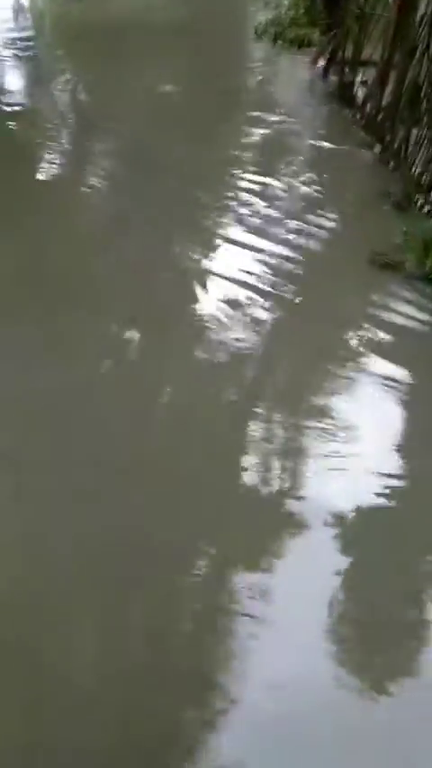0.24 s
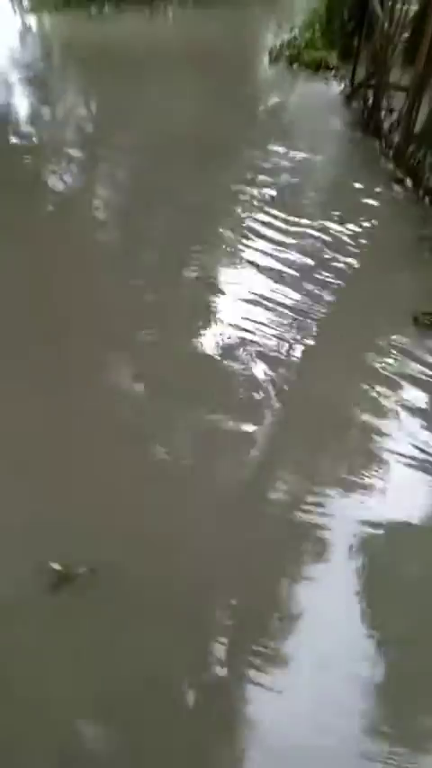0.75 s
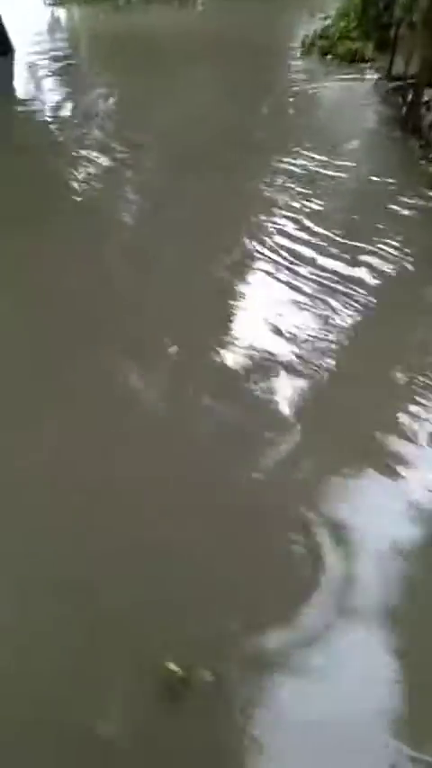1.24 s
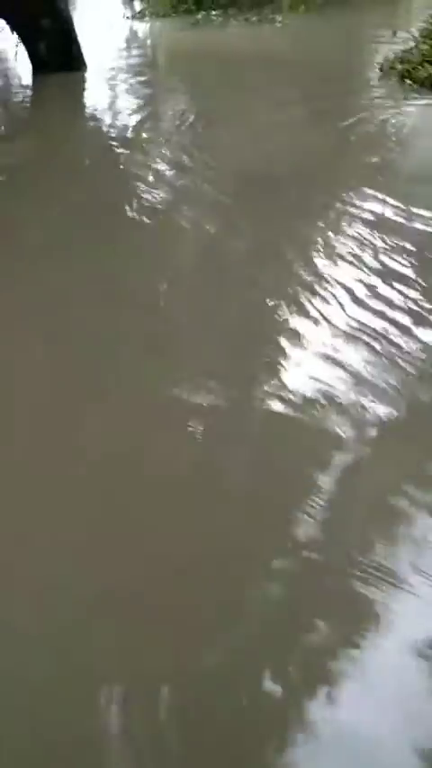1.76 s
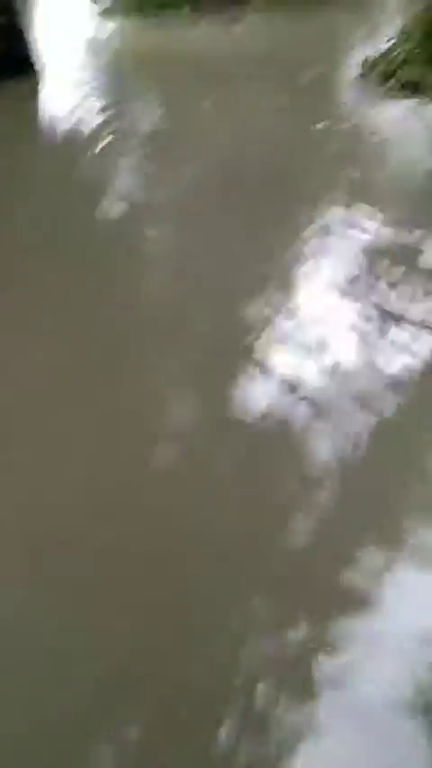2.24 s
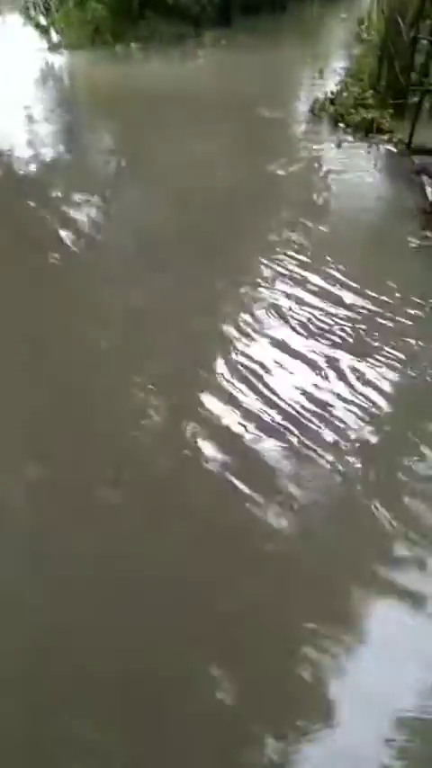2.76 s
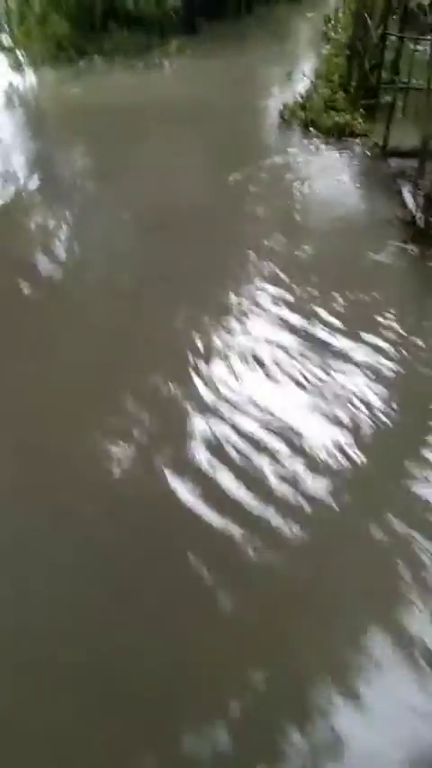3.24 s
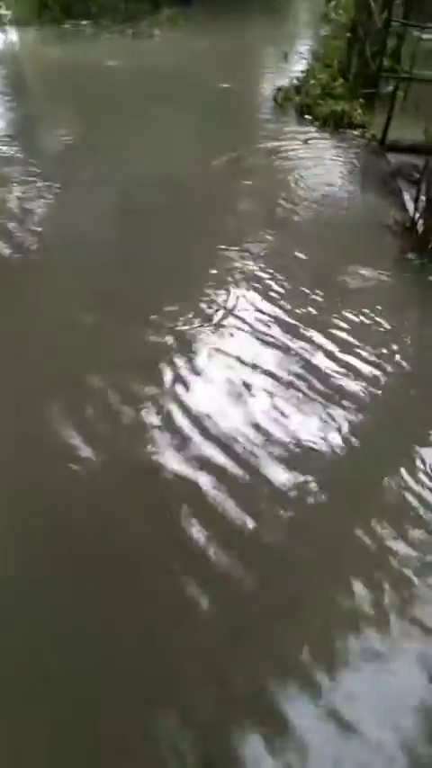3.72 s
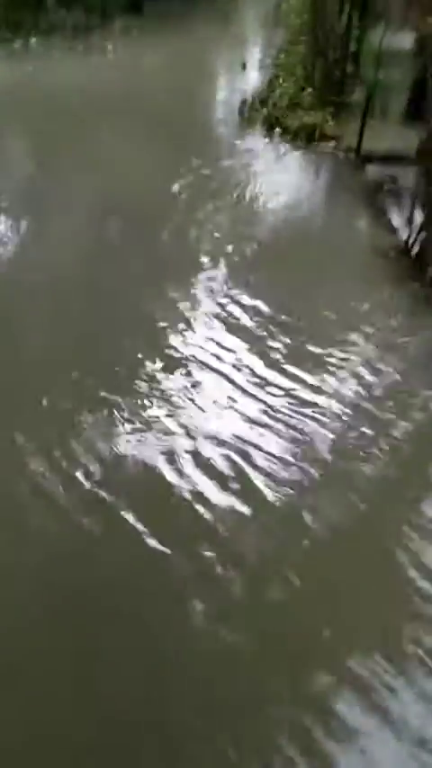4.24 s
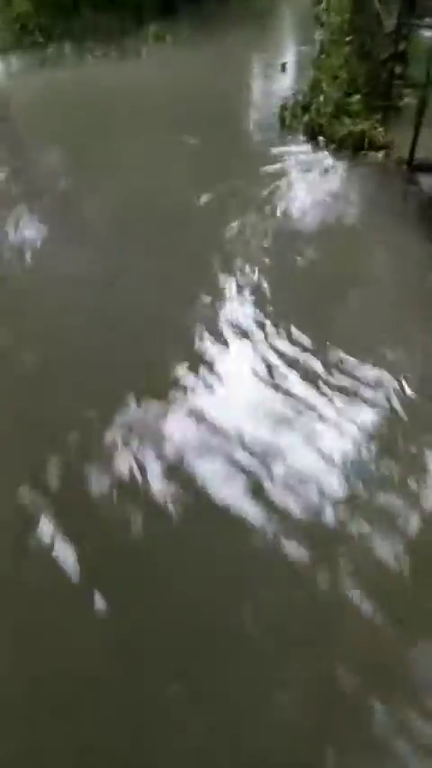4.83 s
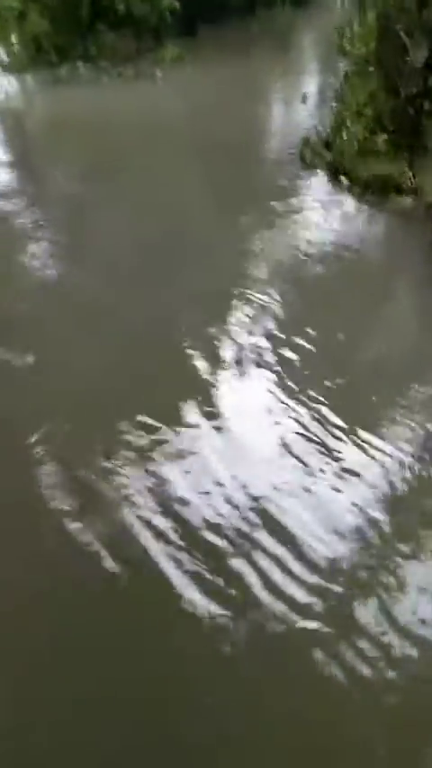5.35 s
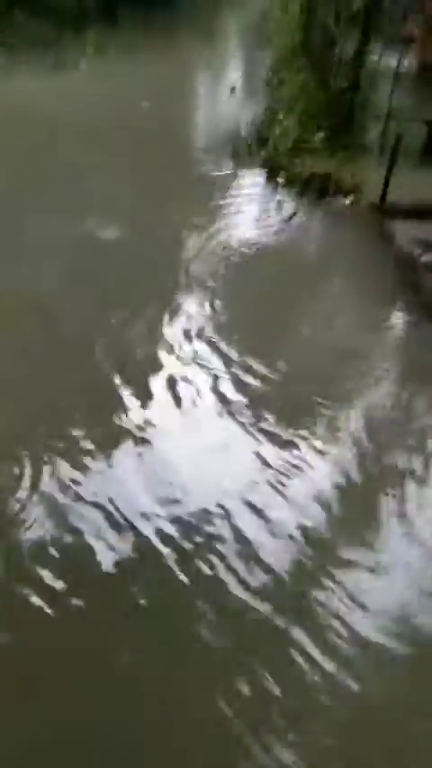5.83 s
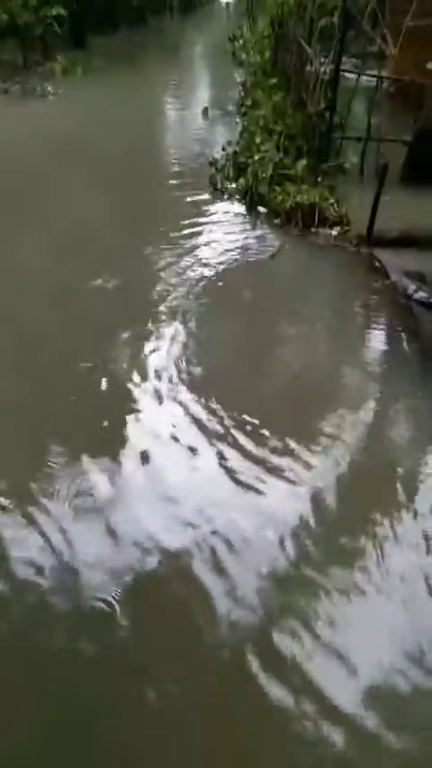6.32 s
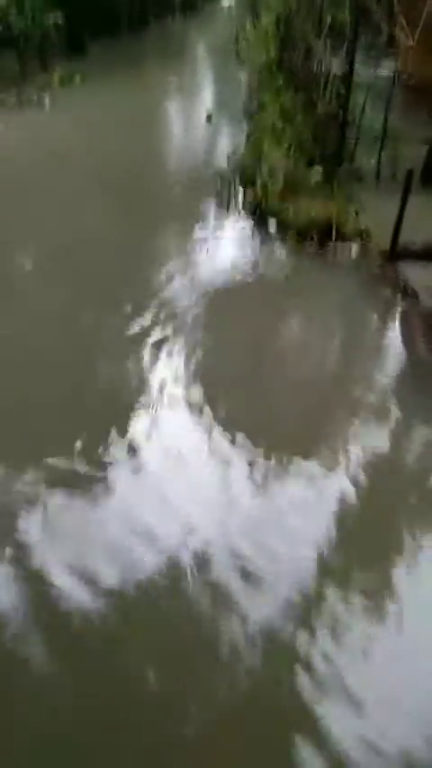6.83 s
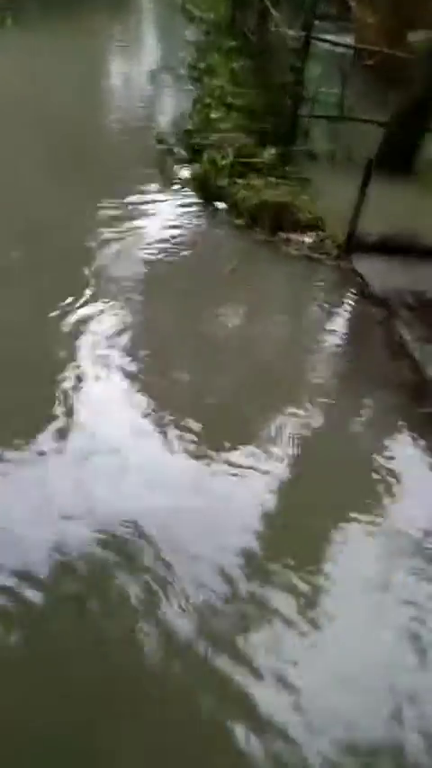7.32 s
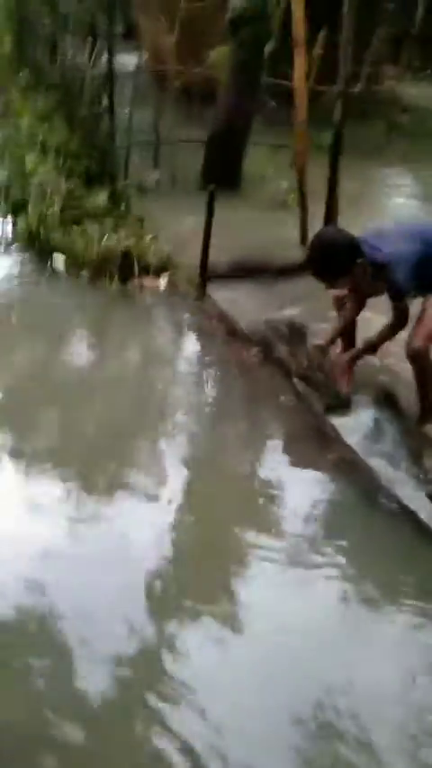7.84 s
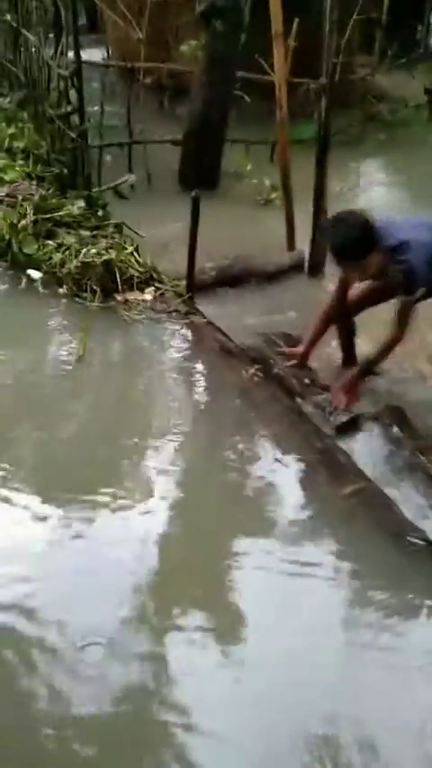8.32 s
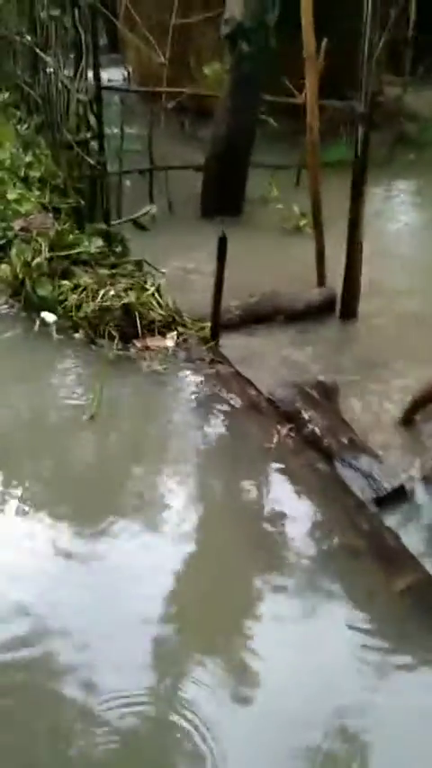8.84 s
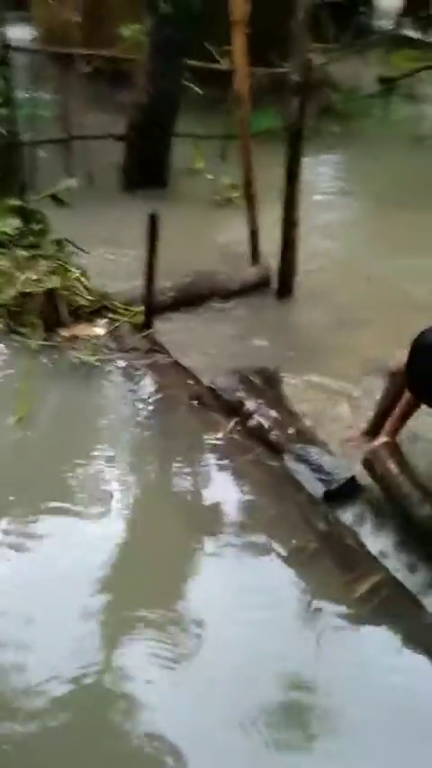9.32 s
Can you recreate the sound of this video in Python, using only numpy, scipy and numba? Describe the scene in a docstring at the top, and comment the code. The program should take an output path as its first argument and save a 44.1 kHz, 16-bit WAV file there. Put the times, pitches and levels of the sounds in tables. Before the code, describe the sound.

Floodwater pours over a low barrier, bubbling and hissing with gulps and small splashes, slowly fading and turning thin and patchy.

```python
"""Floodwater pours over a low barrier beside a flooded road while a phone is carried past and away.
From the start, bubbles of all sizes ring in the spill under hissing spray, fizzing foam and ticking
droplets, with puffs of low rumble. After a second, single gulps and splashes join in; the gulps stand
out more as the spill falls behind and its colour turns. All the while the phone's noise suppressor
slowly learns the rush, eating ever more holes into it."""
import sys
import numpy as np
from scipy import signal
from scipy.fft import rfft, irfft
from scipy.io import wavfile
from scipy.ndimage import uniform_filter1d
from numba import njit

SR = 44100
rng = np.random.default_rng(int(sys.argv[2]) if len(sys.argv) > 2 else 0)


def persist_wave(psi):
    """Save psi, clipped to +-1, as 16-bit WAV."""
    counts = np.round(np.clip(psi, -1, 1) * 32767).astype(np.int16)
    wavfile.write(sys.argv[1], SR, np.atleast_2d(counts).T)


N = 422029

# Rumble, gulping, gurgle, burble, rush and spray. Each row: lowest and highest pitch in Hz, bubbles
# per second, cycles to fade by 30 dB, size scatter in dB, share of plain hiss from 0 to 1.
BUBBLE_SWARMS = [(44, 229, 160, 2.33, 4, 0.98), (205.4, 429, 200, 4.85, 0.5, 0.1),
                 (471.4, 893, 220, 13.6, 3.5, 0.89), (815.5, 1644, 500, 15.2, 2, 0.96),
                 (1530, 2375, 1500, 15.1, 3, 0.94), (2436, 16800, 6000, 5.7, 2, 0.76)]
# Tone of the spill. Each row: frequency in Hz, gain in dB.
WATER_TONE = [(24, -40), (45, -14), (123, -13), (203, -18), (303, -10.5), (463, -7.5), (763, -3.5),
              (980, -8.5), (2070, -1), (4300, -4.5), (7240, -3.5), (9000, -12.5), (12000, -23),
              (15700, -27)]
# Hollows ringing under the falling sheet of water. Each row: pitch in Hz, width in Hz, lift in dB.
SHEET_HOLLOWS = [(101.7, 85, 4), (316, 208, 12.5), (565, 180, 4), (1024, 260, 12.5), (1414, 176, 11.5),
                 (1808, 158, 9), (2187, 140, 3), (7520, 73, 10), (8040, 270, 3), (8630, 540, 5)]
# The spill fades as the phone is carried off. Each row: time in seconds, then the fader in dB for the
# big bubbles, the rush and the spray.
SPILL_FADERS = [(0, 0.5, -29.5, -25), (.7, 1, -31, -25), (1.3, 0, -32.5, -25), (2, 0, -31.5, -25.5),
                (2.6, -4, -33, -26.5), (3, -4, -31.5, -26), (3.5, -3, -33, -27), (4.2, -8.5, -33, -28),
                (4.65, -7.5, -34.5, -29), (5.15, -12, -37, -28), (5.6, -12, -36, -28), (6.1, -16, -35, -29),
                (6.5, -14.5, -34, -28.5), (7.05, -19.5, -35.5, -30), (7.4, -18.5, -33.5, -30),
                (7.86, -18.5, -35, -31.5), (8.4, -14.5, -34.5, -30), (8.95, -19, -37, -31.5),
                (9.3, -16.5, -35, -30.5), (9.57, -19.5, -34, -31)]
# The four lowest swarms. Each row: base level in dB, share of the big-bubble fader, flutter in dB.
BIG_BUBBLE_MIX = [(-56, 0.14, 3), (-44, 0.71, 1), (-41.5, 0.83, 2), (-29, 0.87, 0)]
# Spurts and lulls of spray. Each row: centre in seconds, length in seconds, lift in dB.
SPRAY_SPURTS = [(4.47, .1, -1), (4.613, 0.12, 3), (5.19, 0.07, -1.5), (6.097, .08, -1.5), (6.726, 0.075, 0),
                (7.05, 0.091, -1.5), (7.5, 0.086, 0.5), (8.174, .1, 1), (8.31, .08, -1), (8.593, 0.041, 0),
                (8.73, 0.088, -1), (8.964, 0.076, -1), (9.078, 0.066, 0.5), (9.293, .07, -1.5)]
# Colour as the phone turns. Each row: frequency and width in Hz, lift in dB when facing and when
# turned away, halfway time in seconds.
TURNING_BANDS = [(1297, 250, -5, 1.5, 2.2), (3630, 2160, 2, -3.5, 4.24), (7596, 170, -7.5, -14, 5.5),
                 (7870, 310, 1.5, -21, 9.5), (3200, 190, -1, 2.5, 1.3), (3750, 360, 0.5, 5.5, 10.3),
                 (5230, 670, 0.5, 2.5, 2.6), (6840, 780, 1.5, -2, 7.1), (2550, 170, 3, -2.5, 2)]
# One ringing band comes and goes. Each row: time in seconds, lift in dB.
RINGING_LIFT = [(0, 0.5), (3, -0.5), (4.5, -0.5), (5.8, 0), (6.3, -4.5), (6.75, -7.5), (7.0, -2.5),
                (7.5, -7), (8.3, -4), (8.5, 1), (8.85, 1), (9.0, -1), (9.15, -5), (9.23, 2.5), (9.57, 2.5)]
# Low puffs of wind or handling. Each row: peak time in seconds, length in seconds, lift in dB.
RUMBLE_PUFFS = [(0.212, 0.21, 26), (0.646, 0.089, 11), (1.02, 0.0905, 14), (1.775, 0.42, 16.5),
                (2.14, 0.084, -0.5), (2.62, 0.331, 6), (2.9, 0.47, 8), (3.29, 0.091, 5), (3.694, 0.21, 26),
                (4.366, 0.48, 11), (4.61, 0.15, 10), (4.917, 0.1, 14), (5.143, 0.12, 18), (5.483, 0.19, 11),
                (5.82, 0.092, 8.5), (6.105, 0.057, 10), (6.318, 0.29, 20), (6.823, 0.83, 17.5),
                (7.297, 0.11, 12.5), (7.52, 0.075, 10), (7.765, 0.68, 12), (8.297, 0.2, 5.5),
                (8.6, 0.21, 6), (8.794, 0.17, 17), (9.14, .2, 12.5), (9.42, 0.36, 17.5)]
# Flurries and lulls of like-sized bubbles. Each row: peak time and length in seconds, pitch in Hz,
# lift in dB.
BUBBLE_FLURRIES = [(0.92, 0.25, 305.9, 9), (1.098, 0.13, 305, 8), (1.325, 0.17, 477, 19),
                   (1.78, 0.33, 198, 6.5), (2.09, 0.047, 310, 9), (2.584, 0.46, 294, 9.5),
                   (2.808, 0.34, 1160, 6.5), (3.48, 0.085, 340, 4), (3.694, 0.14, 286, 14.5),
                   (3.718, 0.11, 750, 14), (3.925, 0.06, 700, 13.5), (4.153, 0.074, 343, 14),
                   (4.315, 0.037, 426, 14), (4.469, 0.022, 318, 11), (4.453, 0.047, 1190, 5.5),
                   (4.613, 0.056, 312, 2.5), (4.65, 0.2, 950, 5.5), (4.634, .15, 2880, 2.5),
                   (4.747, 0.19, 600, 14.5), (4.933, 0.11, 322, 6), (5.134, 0.12, 302, 16.5),
                   (5.17, 0.081, 560, 9), (5.326, 0.12, 308, 17), (5.396, 0.21, 1010, 6.5),
                   (5.625, 0.28, 327, 8.5), (5.61, 0.15, 576, 15), (6.113, 0.14, 294, 18.5),
                   (6.075, 0.095, 1240, 7), (6.337, 0.041, 790, 5), (6.307, 0.15, 1370, 6),
                   (6.378, 0.062, 330, 16), (6.538, 0.051, 332, 18.5), (6.593, .07, 890, 9),
                   (6.987, 0.18, 307, 25), (6.997, 0.092, 1050, 10.5), (7.134, 0.17, 1150, 9.5),
                   (5.85, .25, 1230, -1), (3.403, .25, 560, -5.5), (5.02, .2, 950, -3),
                   (6.78, .15, 1400, -7), (8.1, 0.52, 1000, -2), (9.413, 0.11, 1380, 3),
                   (7.196, 0.33, 295, 10), (7.286, 0.21, 332, 7.5), (7.329, 0.067, 1160, 14.5),
                   (7.406, 0.063, 557, 21), (7.521, 0.11, 322, 17), (7.914, 0.075, 324, 18.5),
                   (0.35, 0.61, 613, 4.5), (0.657, 0.2, 590, 6.5), (.9, 0.28, 530, 4),
                   (1.104, 0.28, 636, 10), (1.602, 0.17, 540, 6), (1.946, 0.13, 600, 2.5),
                   (2.14, 0.076, 636, 12), (2.517, .07, 673.8, 14.5), (2.783, 0.19, 685, 12),
                   (3.127, 0.042, 507, 14)]
# Tone of the foam. Each row: frequency in Hz, gain in dB.
FOAM_TONE = [(9000, 5), (12000, -18), (14500, -12), (15700, 6)]
# Tone of thrown drops. Each row: frequency in Hz, gain in dB.
DROP_TONE = [(1400, 8), (4000, 1), (8000, 5), (12000, -7.5), (15700, -21)]
# Single gulps and drips. Each row: start in seconds, level in dB, pitch in Hz, seconds to fade by 60 dB.
GULP_CUES = [(1.129, -22, 307, 0.11), (2.555, -27, 322, 0.1), (3.612, -26, 600, 0.049),
             (3.66, -29, 255.2, 0.0449), (3.84, -27, 638, 0.056), (4.752, -15.5, 585, 0.063),
             (5.395, -27, 1000, 0.11), (5.599, -15, 1520, 0.027), (6.104, -21.5, 242, 0.046),
             (6.31, -31, 823, 0.16), (6.47, -26.5, 1324, 0.08), (6.566, -26.5, 1120, 0.045),
             (6.969, -19.5, 337, 0.057), (6.986, -15, 312, 0.045), (6.972, -25.5, 1060, 0.04),
             (7.112, -26, 1070, .06), (7.3167, -15.5, 1340, 0.019), (7.317, -21, 980, 0.03),
             (7.459, -24.5, 846, 0.027), (7.646, -23.5, 896, 0.028), (8.092, -26, 740, 0.022),
             (8.825, -16, 1800, 0.034), (9.531, -29, 984, 0.14)]
# Splashes. Each row: start in seconds, level in dB, decay time in seconds.
SPLASH_CUES = [(1.259, -16.5, 0.004), (1.33, -20.5, 0.0076), (1.645, -25, 0.0036), (2.011, -21, .003),
               (4.62, -31, 0.02), (4.866, -26.5, 0.0072), (7.317, -37, 0.0064), (7.489, -28, 0.003),
               (7.52, -29, 0.003)]
# Bands the suppressor knows best at the start. Each row: frequency in Hz, width in Hz, lift in dB.
KNOWN_BANDS = [(440, 60, 6), (760, 59, 5), (1210, 51, 8.5), (1600, 54, 12), (2430, 61, 10.5)]
# Steady bands where it bites harder or softer. Each row: frequency in Hz, width in Hz, extra bite in dB.
BITE_BANDS = [(90, 170, -3), (440, 57, 7), (710, 56, 2.5), (1184, 45, 3), (1667, 98, 2.5), (8700, 200, -9),
              (14260, 7800, -10)]
# Wandering lanes of deep bite, and one wide, gentler stretch. Each row: frequency in Hz, width in Hz,
# extra bite in dB.
BITE_LANES = [(2460, 93, 5), (2756, 110, 4), (3350, 130, 4.5), (4530, 70, 3.5), (4800, 95, 5.5),
              (6840, 370, 4.5), (3730, 2400, -1)]
# Tone of the phone's own murmur. Each row: frequency in Hz, gain in dB.
MURMUR_TONE = [(24, -16), (60, 5.5), (110, 4.5), (190, -11), (310, -1.5), (1190, -2.5), (1500, -0.5)]


def undb(db):
    """Decibels to amplitude."""
    return 10 ** (np.asarray(db) / 20)


def level(x, db):
    """Set the RMS level."""
    return x * undb(db) / np.sqrt(np.mean(x ** 2))


def bell(x, centre, width):
    """A smooth hump of height 1."""
    return np.exp(-2 * ((x - centre) / width) ** 2)


def slope_db(table, hz):
    """An EQ curve through (Hz, dB) points on a log axis."""
    points_hz, points_db = np.transpose(table)
    return np.interp(np.log(hz + 1), np.log(points_hz), points_db)


def humps_db(table, hz):
    """An EQ curve of bell-shaped lifts."""
    return sum(db * bell(hz, centre, width) for centre, width, db in table)


def colour(x, tone, lo_hz, hi_hz, humps=()):
    """Apply an EQ and keep one band with soft edges."""
    hz = np.arange(N // 2 + 1) * SR / N + 1e-9
    edges = 1 / np.sqrt((1 + (lo_hz / hz) ** 24) * (1 + (hz / hi_hz) ** 24))
    return irfft(rfft(x) * undb(slope_db(tone, hz) + humps_db(humps, hz)) * edges, N)


def mottle(shape, bins, frames):
    """Random patches over frequency and time, with a spread of 1."""
    x = rng.standard_normal(shape)
    for size, axis in ((bins, 0), (frames, 1)):
        x = uniform_filter1d(uniform_filter1d(x, size, axis=axis), size, axis=axis)
    return x / x.std()


def flutter(per_s=12):
    """A random fader ride with a spread near 1."""
    hold = int(SR / per_s)
    steps = np.repeat(rng.standard_normal(300), hold)
    return 1.3 * uniform_filter1d(steps, hold)[:N]


FRAME, HOP = 1024, 256  # samples


def analyse(x):
    """Sound to frequencies, frame times and short spectra."""
    return signal.stft(x, SR, nperseg=FRAME, noverlap=FRAME - HOP)


def synthesise(spectra):
    """Short spectra back to sound."""
    return signal.istft(spectra, SR, nperseg=FRAME, noverlap=FRAME - HOP)[1][:N]


@njit
def ring_bubbles(start, hz, t60, size, glide):
    """Each bubble swells fast, rings down and rises in pitch as it nears the surface; times in samples."""
    out = np.zeros(N)
    for k in range(len(start)):
        phasor = size[k] + 0j
        step = 2 * np.pi * hz[k] / SR
        fade = np.exp(-np.log(1000.) / t60[k])
        for i in range(start[k], min(start[k] + int(t60[k]), N)):
            phasor *= fade * np.exp(1j * step)
            step *= 1 + glide / t60[k]
            attack = min(1., (i - start[k]) * 12 / t60[k])
            out[i] += phasor.imag * attack
    return out


def swarm(lo_hz, hi_hz, per_s, cycles, scatter_db, hiss_share):
    """Random bubbles within a range of sizes, over the hiss of those too many to tell apart."""
    pool = rng.random((int(40 * hi_hz ** .8), 3))
    when, pitch, odds = pool[:int(per_s * N / SR)].T
    hz = lo_hz + (hi_hz - lo_hz) * pitch
    size = undb(-scatter_db * np.log(1 - .97 * odds)) * np.sqrt(hz / hi_hz)
    bubbles = ring_bubbles((when * N).astype(np.int64), hz, 2 * cycles * SR / hz, size, glide=0.4)
    mix = np.sqrt(1 - hiss_share) * level(bubbles, 0) + np.sqrt(hiss_share) * rng.standard_normal(N)
    return level(colour(mix, WATER_TONE, lo_hz, hi_hz, SHEET_HOLLOWS), 0)


def faders_db():
    """Big bubbles, rush and spray sink as the phone is carried away."""
    times, *faders = np.transpose(SPILL_FADERS)
    return [np.interp(np.arange(N) / SR, times, db) for db in faders]


def sheet_wobble_db(hz, t, wander=0.025, swell_db=1.5, calm_s=5.5):
    """The wobbling sheet detunes and swells each hollow; the swelling calms as the spill falls behind."""
    drifts, swells = (mottle((len(SHEET_HOLLOWS), len(t)), bins=1, frames=14) for _ in range(2))
    moved = [(pitch + wander * min(pitch, 2200) * drift, width, db + swell_db * swell * np.exp(-t / calm_s))
             for (pitch, width, db), drift, swell in zip(SHEET_HOLLOWS, drifts, swells)]
    return humps_db(moved, hz[:, None]) - humps_db(SHEET_HOLLOWS, hz[:, None])


def turning_db(hz, t, turn_s=1.5, ring_hz=1820, ring_width_hz=170):
    """The colour slides as the phone turns away, while one ringing band comes and goes."""
    bands = [(centre, width, facing + (away - facing) / (1 + np.exp((halfway - t) / turn_s)))
             for centre, width, facing, away, halfway in TURNING_BANDS]
    ringing = (ring_hz, ring_width_hz, np.interp(t, *np.transpose(RINGING_LIFT)))
    return humps_db(bands + [ringing], hz[:, None])


def surge(hz, t, at, length, pitch, octaves):
    """One patch of the spectrum rises in a third of the time it takes to fall."""
    envelope = bell(t, at, length * np.where(t < at, 0.33, 1))
    return envelope * bell(np.log2(hz + 1)[:, None], np.log2(pitch), octaves)


def puffs_db(hz, t):
    """Wind or handling swells the low rumble."""
    return sum(db * surge(hz, t, at, length, pitch=113, octaves=1.04) for at, length, db in RUMBLE_PUFFS)


def flurries_db(hz, t):
    """Bubbles of one size crowd in or thin out for a moment."""
    return sum(db * surge(hz, t, at, length, pitch, octaves=0.46)
               for at, length, pitch, db in BUBBLE_FLURRIES)


def spill():
    """Water pours over the barrier: six bubble swarms under a restless EQ."""
    big, rush, spray = faders_db()
    spray += sum(db * bell(np.arange(N) / SR, at, length) for at, length, db in SPRAY_SPURTS)
    levels_db = [db + follow * big + flutter_db * flutter() for db, follow, flutter_db in BIG_BUBBLE_MIX]
    levels_db += [rush + 0.16 * flutter(), spray + 0.31 * flutter()]
    water = sum(swarm(*row) * undb(db) for row, db in zip(BUBBLE_SWARMS, levels_db))
    hz, t, spectra = analyse(water)
    # Eddies swell and sink narrow patches, less so in the bass; bursts of spray flick the treble.
    eddies_db = 1.6 * np.clip(hz / 900, .3, 1)[:, None] * mottle(spectra.shape, bins=2, frames=9)
    flicks_db = 2.2 * np.clip(hz / 12000, 0, 1)[:, None] ** 2 * mottle(spectra.shape, bins=120, frames=1)
    motion_db = sheet_wobble_db(hz, t) + turning_db(hz, t) + puffs_db(hz, t) + flurries_db(hz, t)
    return synthesise(spectra * undb(eddies_db + flicks_db + motion_db))


def foam_fizz():
    """Foam bursts everywhere on the flood: a thin, steady top."""
    return level(colour(rng.standard_normal(N), FOAM_TONE, 7400, 20000), db=-48)


def droplet_crackle(per_s=170, scatter_db=9.5, decay_s=0.0038, under_spray_db=17.5):
    """Fine droplets tick at random, fainter as the spray fades."""
    when, odds = rng.random((2, N))
    ticks = (when < per_s / SR) * undb(-scatter_db * np.log(1 - .97 * odds))
    envelope = signal.lfilter([1], [1, -np.exp(-1 / (decay_s * SR))], ticks)
    drops = colour(envelope * rng.standard_normal(N), DROP_TONE, 5600, 17000)
    *_, spray_db = faders_db()
    return level(drops, spray_db - under_spray_db)


def gulps():
    """Large single bubbles ring out as gulps and drips, bending slightly upward."""
    start, db, hz, t60 = np.transpose(GULP_CUES)
    return ring_bubbles((start * SR).astype(np.int64), hz, t60 * SR, undb(db), glide=0.06)


def splashes():
    """Thrown drops land in short, bright bursts."""
    t = np.arange(N) / SR
    envelope = sum(undb(db) * (t >= at) * np.exp(-np.abs(t - at) / decay) for at, db, decay in SPLASH_CUES)
    return envelope * level(colour(rng.standard_normal(N), DROP_TONE, 1600, 17000), 0)


def scene():
    """All the water, centred on two channels."""
    return np.tile(spill() + gulps() + splashes() + foam_fizz() + droplet_crackle(), (2, 1))


def noise_suppressor(x, learn_s=4.46, memory_s=3.63, known_share=0.081, base_bite_db=-5, floor_db=-44):
    """Learn the mean power of each band, more firmly over time, and subtract it from the present power."""
    hz, t, spectra = analyse(x)
    power = uniform_filter1d(np.abs(spectra) ** 2, size=2, axis=0)
    present = uniform_filter1d(power, size=13, axis=1)
    keep = np.exp(-HOP / SR / memory_s)
    learnt = signal.lfilter([1 - keep], [1, -keep], power, axis=1) * (1 - np.exp(-t / learn_s))
    # A share of the first second's noise is known from the start, then slowly forgotten.
    opening = power[:, t < 1].mean(axis=1) * undb(2 * humps_db(KNOWN_BANDS, hz))
    learnt += known_share * opening[:, None] * np.exp(-t / memory_s)
    drifts = 1 + 0.012 * mottle((len(BITE_LANES), len(t)), bins=1, frames=30)
    lanes = [(centre * drift, width, db) for (centre, width, db), drift in zip(BITE_LANES, drifts)]
    bite_db = base_bite_db + humps_db(BITE_BANDS + lanes, hz[:, None])
    share_left = 1 - learnt * undb(2 * bite_db) / (present + 1e-18)
    return synthesise(spectra * np.sqrt(np.maximum(share_left, undb(2 * floor_db))))


def record(dry, top_hz=15770):
    """The phone's one microphone on both channels: suppressor, its own soft murmur, a steep high cut."""
    murmur = colour(rng.standard_normal(N), MURMUR_TONE, 25, 2000)
    mono = noise_suppressor(dry.mean(axis=0)) + level(murmur, db=-52.5)
    high_cut = signal.ellip(16, .3, 80, top_hz, fs=SR, output="sos")
    return np.tile(signal.sosfilt(high_cut, mono), (2, 1))


dry = scene()
out = record(dry)
persist_wave(out)
```